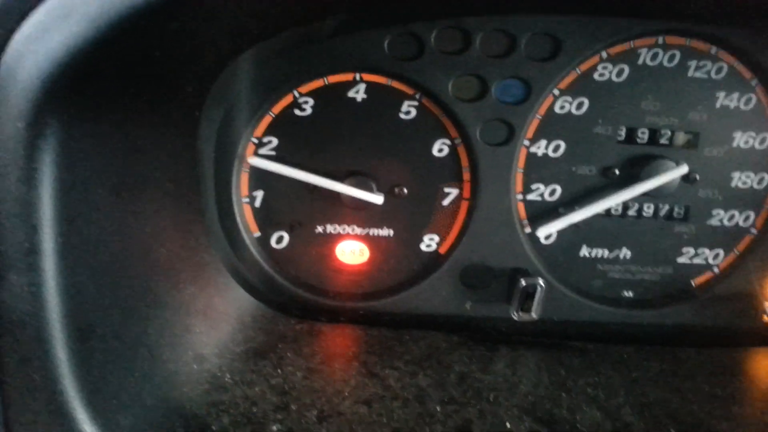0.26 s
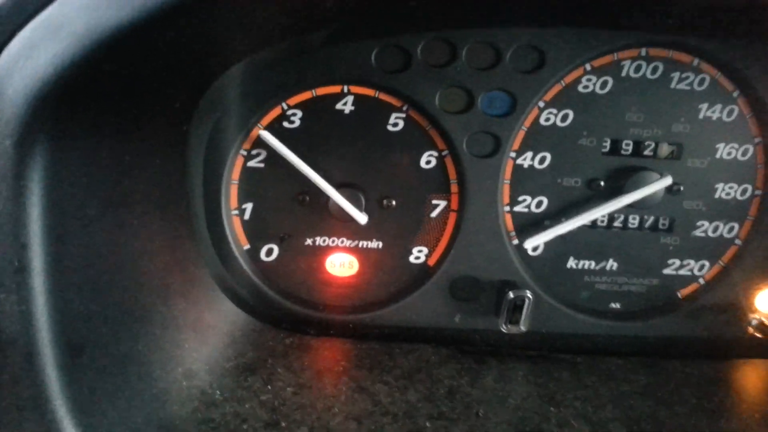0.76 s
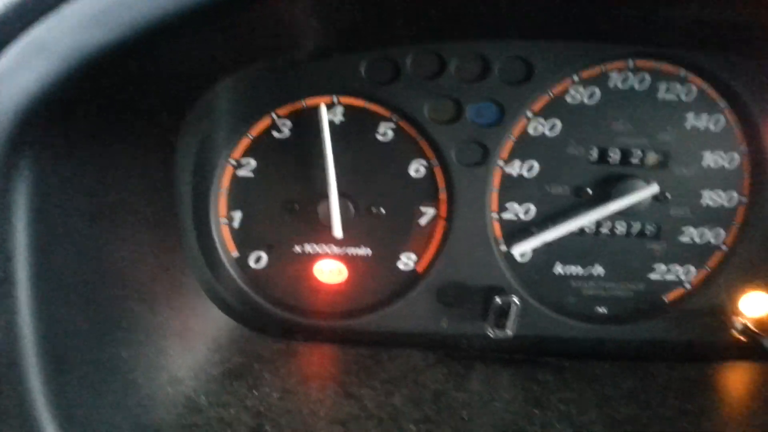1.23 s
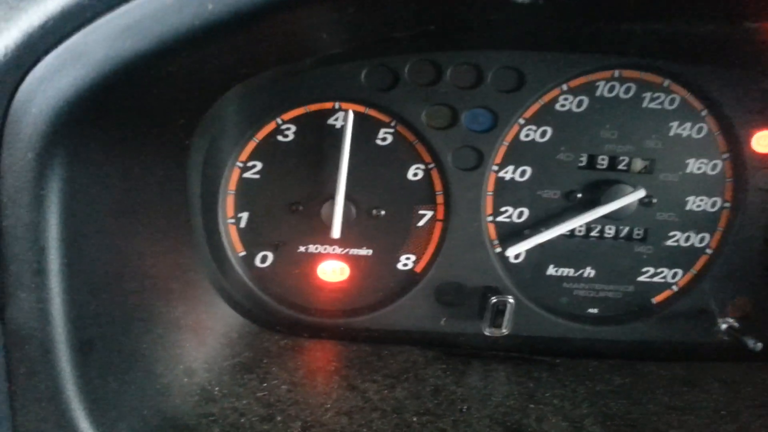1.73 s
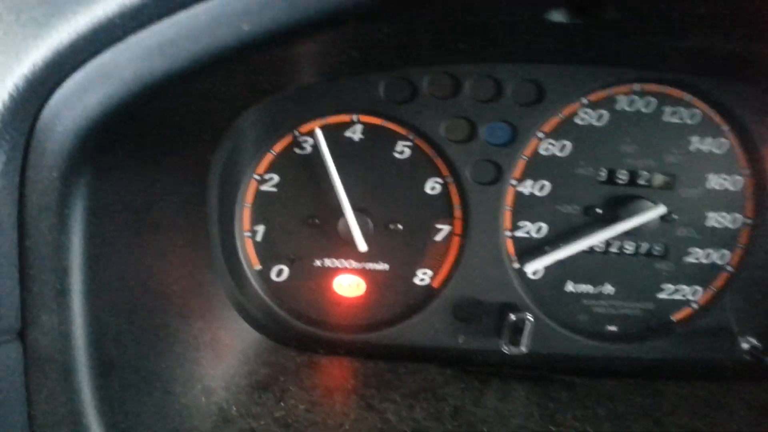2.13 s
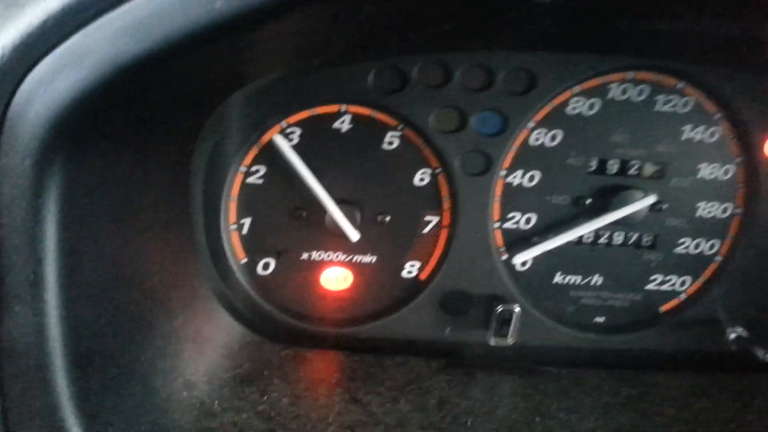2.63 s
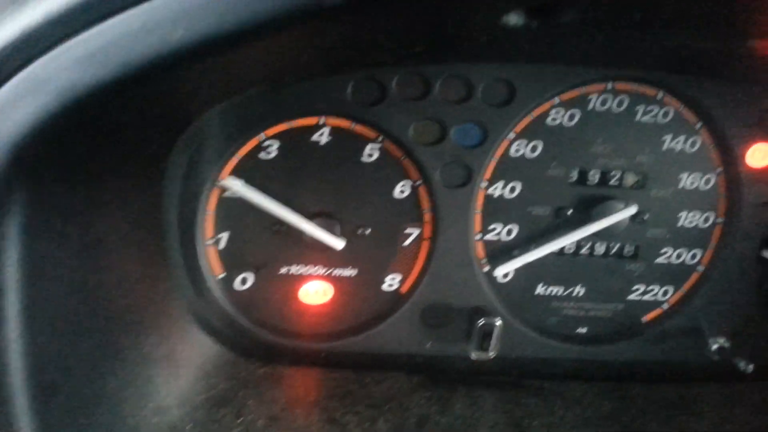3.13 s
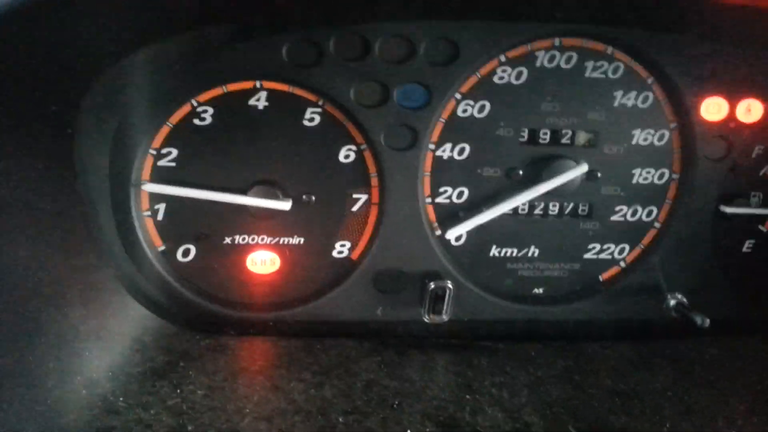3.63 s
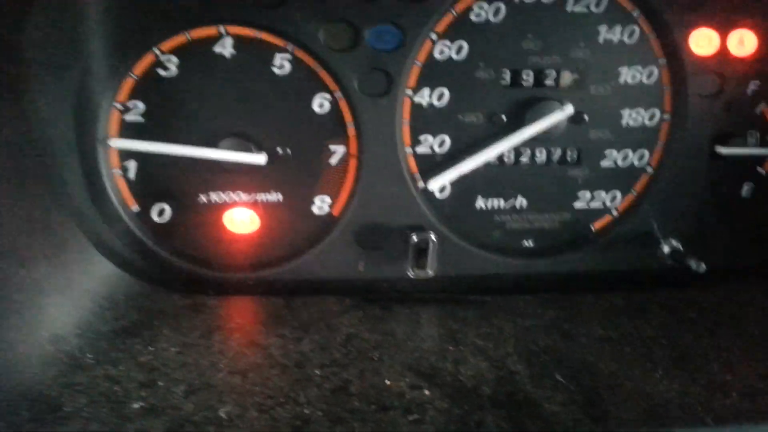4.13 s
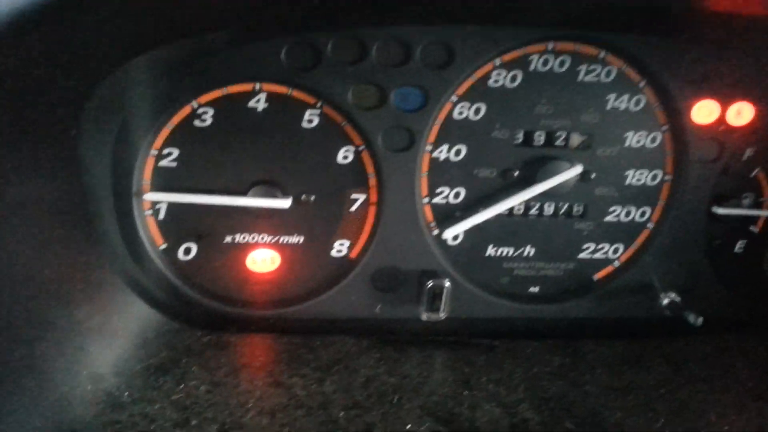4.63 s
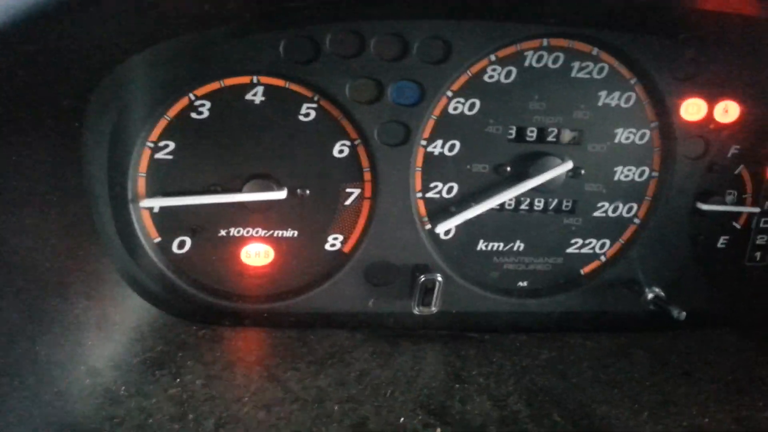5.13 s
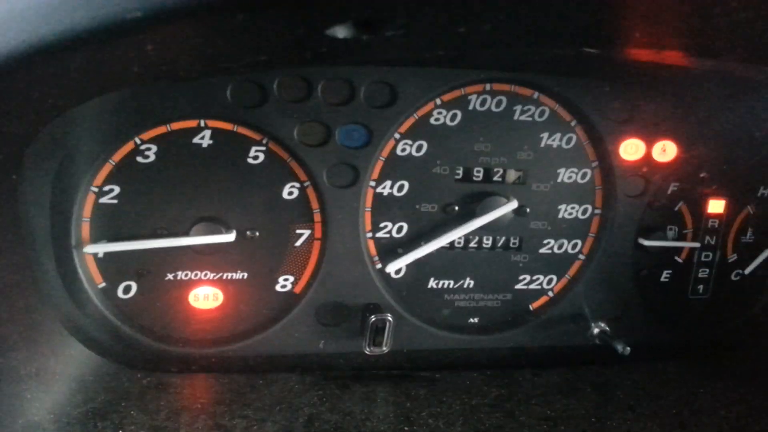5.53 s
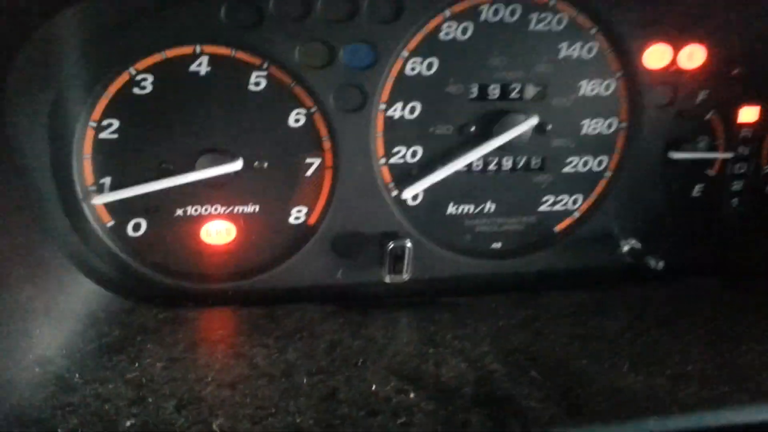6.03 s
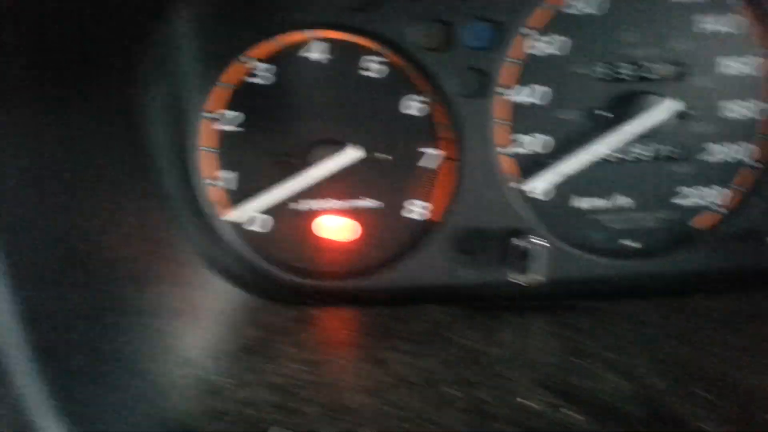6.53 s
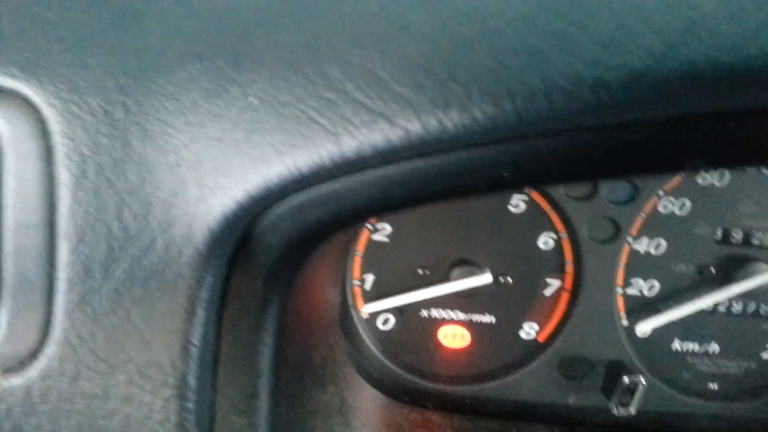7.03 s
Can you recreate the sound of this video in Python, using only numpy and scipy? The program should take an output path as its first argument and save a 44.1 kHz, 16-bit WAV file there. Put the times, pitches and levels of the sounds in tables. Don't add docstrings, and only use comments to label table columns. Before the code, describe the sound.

From the driver's seat, a four-cylinder engine is already revving at 0 s, a low boomy growl broken by missed firings and hard pops. From 0.5 to 1.2 s it climbs more cleanly, with a thin airy whistle near the top. From 1.25 to 1.65 s it peaks as a harsh, pulsing roar with one cylinder out. The throttle shuts and the pitch slides down until 2.15 s in a hollow intake drone; ragged popping barks follow until 2.8 s, then another short coast. From 3.2 s it limps in separate boomy thumps, about twelve a second, with gassy rasps and ringing panels, stumbling in quick clusters near 3.9 s. Beats slow and dull after 4.6 s. By 6.1-6.5 s it nearly stalls, leaving faint pumping, hiss and a tiny belt chirp. Around 7 s it catches with quick low thuds and knocking trim. Loud peaks distort.

```python
import sys
import numpy as np
from scipy import signal
from scipy.fft import rfft, irfft, next_fast_len
from scipy.io import wavfile
from scipy.ndimage import uniform_filter1d, map_coordinates

SR = 44100
rng = np.random.default_rng(int(sys.argv[2]) if len(sys.argv) > 2 else 0)


def magnitude_from_level(level_db):
    exponent = np.asarray(level_db, float) / 20
    return 10 ** exponent


def store_wav(level_fs):
    pcm = np.round(np.clip(np.atleast_2d(level_fs), -1, 1) * 32767)
    wavfile.write(sys.argv[1], SR, pcm.T.astype(np.int16))


N = 320607
TIME = np.arange(N) / SR

# start_s, firing_rate_hz
SPEED = [(0, 58.44), (.09, 63.68), (.2, 61.4), (.36, 69.82), (.48, 69), (.65, 85.77), (.76, 85.56),
         (.86, 99.04), (1.16, 132), (1.28, 133.1), (1.51, 143.6), (1.63, 140.5), (1.72, 130.9),
         (2.21, 93.67), (2.38, 95.64), (2.61, 80.67), (2.77, 84.19), (3.2, 58.26)]
# start_s, end_s, loss_hz (negative: gain)
SPEED_SHIFTS = [
    (.9, .93, -2),
    (.96, 1.04, 2.5),
    (1.49, 1.55, 2),
]
# start_s, load_db, cylinder unevenness (0-1)
THROTTLE = [(0, -30, 0.05), (.11, -27.5, 0.01), (.3, -26.5, 0.48), (.6, -26.5, 0.21), (1.05, -22, 0.1),
            (1.23, -31, 0.2), (1.27, -22, 0.5), (1.63, -23.5, 0.43), (1.7, -28, 0.5), (1.9, -32, 0),
            (2.12, -31.5, 0.1), (2.17, -30.5, 0.3), (2.35, -34, 0.08), (2.47, -28.5, 0.6), (2.5, -32, 0),
            (2.81, -34, 0.4), (3.05, -47, 0.2), (3.15, -78, 0.4)]
# start_s, end_s, depth (0-1)
COASTS = [
    (1.67, 2.143, 1),
    (2.86, 3.2, 0.44),
]
# start_s, end_s, loss_db
MISSES = [(.115, .222, 14), (.25, .273, 14), (.383, .405, 14), (.433, .463, 17), (.492, .503, 6),
          (.672, .715, 12), (.733, .75, 10), (.942, .958, 12), (1.185, 1.2, 6), (2.192, 2.202, 9),
          (2.247, 2.262, 12), (2.275, 2.288, 12), (2.4, 2.418, 9), (2.535, 2.556, 6), (2.592, 2.606, 9),
          (2.64, 2.654, 9), (2.685, 2.7, 9), (2.735, 2.747, 9), (2.782, 2.796, 9)]
# start_s, end_s, depth (0-1)
DEAD_CYLINDER = [
    (1.25, 1.65, 1),
    (1.9, 2.7, 0.07),
    (0.18, 0.29, 0.6),
]
# start_s, end_s, loss_db
CLEAN = [
    (.5, .67, 0.5),
    (.76, .94, 2),
    (.96, 1.2, 0.5),
]
CYLINDERS = [-0.22, -1.77, 0.76, -0.48]
# start_s, second_order_db (lopsided), third_order_db (sharp), upper_orders_db (edge), front_db (steep)
PULSE = [(0, -3.5, 6, 4.5, 5), (.3, -2, 4, -5, 2), (.5, 2, 0.5, 4, 1), (.65, -4.5, 0, 0.5, 5),
         (.8, -4.5, -0.5, -4.5, 4), (.95, -7, -2, 0.8, 0), (1.03, 3, 0.5, 7, 4), (1.18, -0.5, 6.5, -4.5, 0),
         (1.27, -2, 7.5, -0.5, -2), (1.6, -1, -9.5, 6.5, 0.5), (1.72, -4, -1, -3, 2),
         (2, 5.5, 6.5, -8.5, 1), (2.15, -7.5, -2, -5.5, 10.5), (2.3, -4.5, 3, 1.3, 2),
         (2.48, -1.5, 3.5, -1, 3.5), (2.8, -4.5, 4.5, -13.5, -2.5), (2.9, 2.5, -1.5, 6, 12.5),
         (3.15, -6.5, 6.5, -6, -1.5)]
# multiple of firing rate, level_db, db per db of load, db per unit of unevenness,
# db with a cylinder out, plain pumping coast_level_db
FIRING_ORDERS = [(1, 0.5, 0.23, -2.5, -2, -10), (2, -4.5, -0.16, 1.5, 0.5, -20.5),
                 (3, 2, 1.08, -3.5, -28.5, -23.5), (4, -4, 0.24, -11.5, 5.5, -32.5)]
HALF_ORDERS = [(.5, -24, .1, 19, 11, -36.5), (1.5, -21, 0.28, 10, 2.8, -32), (2.5, -33, .3, 18, 6.1, -27)]
# pitch_hz, gain_db
PIPE = [(60, -21), (95, -7), (135, -11.5), (170, -27), (200, -15.5), (245, -6.5), (290, -11.5),
        (420, -24.5)]
# pitch_hz, gain_db
FIREWALL = [(420, 0.5), (520, -1), (600, 1.5), (750, -2), (900, 1), (1100, -1), (1400, -2)]
# start_s, boom_db, bark_db, rasp_db
POPS = [(.006, -13.5, -8, -26.5), (.217, -10, 2, -24.5), (0.266, -6.5, -0.5, -26.5),
        (0.398, -8.5, -6.5, -48), (.457, -9.5, -1.5, -32), (0.71, -9, -10.5, -43),
        (0.746, -10.5, -10.5, -24.5), (1.825, -10, -6, -32.5), (2.173, -18.5, -0.5, -28),
        (2.227, -19, -1, -31.5), (2.283, -15, 0, -42), (2.468, -23.5, -4, -35), (2.513, -13.5, -2.5, -22.5),
        (2.559, -19, -9, -18), (2.604, -5, 0, -22.5), (2.651, -17.5, -3, -20.5), (2.699, -13, 0.5, -33.5),
        (2.743, -4, -3, -22), (2.793, -11.5, 2, -25.5)]
# start_s, boom_db, fire_db, boom_db of the unfired stroke before
FIRINGS = [(3.406, -1.5, -6.5, -12), (3.485, -1.5, 1.5, -11), (3.567, -1.5, 0, -13), (3.648, -1, -1, -6),
           (3.731, -1, -6, -11.5), (3.818, 2, -3, -1.5), (4.053, -1.5, 0, -10), (4.132, -6, -0.2, -12.5),
           (4.208, -2.5, 2.5, -4), (4.285, -4.5, 1, -5), (4.365, -1, -0.7, -11.5), (4.446, 0.5, -17.5, -15),
           (4.534, 1.5, -3.5, -7.5), (4.728, 4, -8, -10), (4.837, 3, -5, -15.5), (4.943, 3, -6, -24),
           (5.048, 4.5, -0.5, -5.5), (5.153, -0.5, -1, -0.5), (5.357, 2, -3.5, -13), (5.462, 0.5, -2.5, -2),
           (5.572, 2, -2, -16.5), (5.693, 2, -6, -13), (5.822, 3.5, -8, -13), (5.955, 3.5, -13, -12.5),
           (6.099, 3, -24, -19), (6.545, 1.8, -16, -23), (6.767, 3, -19, -8), (6.861, 1.5, -23, -17.5),
           (6.947, 2.5, -19.5, -34)]
# start_s, boom_db, fire_db
CATCHES = [(3.189, 0.5, -8.5), (3.217, -19, -13.5), (3.258, 2.5, -8.5), (3.283, -5.5, -13.5),
           (3.318, -7, -25), (3.86, 1, -8), (3.875, -11, -9), (3.89, 0.5, -3), (3.913, -10, -3.5),
           (3.938, -4.5, -3.5), (3.953, -8.5, -9), (3.969, -8, -23), (4.627, -2.5, -21.5),
           (4.657, -10.5, -21), (5.206, 2.5, -5.5), (5.255, 1, -3.5), (6.003, -17, -44), (6.191, -16, -27),
           (6.236, -18, -25), (6.295, -11.5, -52), (6.36, -8.5, -52), (6.419, -9, -44), (6.653, -9, -31),
           (6.722, -3.5, -37), (6.985, 2, -9), (7.214, 1, -13)]
# pitch_hz, level_db, t60_s, arrival_s
BARK = [(247, 2, 0.078, 0.007615), (355.8, -6.5, 0.062, 0.00578), (195.1, 4.5, 0.034, 0.00508),
        (535, -21, 0.053, 0.00572)]
# pitch_hz, level_db (per Hz)
RASP = [(260, -45.5), (450, 2.5), (745, -6.5), (1000, -15.5), (1730, -20), (5930, -50), (9380, -48),
        (13800, -61.5), (15500, -72.5)]
# pitch_hz, width_hz, lift_db
BLOCK = [(1590, 10, 4.5), (2350, 610, -0.5), (3200, 1500, 2.5), (4660, 1500, 3.5), (964, 30, 3.5)]
# pitch_hz, level_db, t60_s
KNOCK = [(507, -11.5, 0.036), (615, -15.5, 0.041), (778, -18.5, 0.044), (1350, -23.5, 0.034)]
# start_s, peak_db, low_pitch_hz, high_pitch_hz
PANELS = [(2.443, -8, 643, 1320), (2.476, -7, 621, 1250), (2.52, -7.5, 617, 1440), (2.565, -6, 647, 1380),
          (2.611, -4, 613, 1250), (2.656, -6, 613, 1230), (2.703, -8, 600, 1344), (2.75, -8, 628, 1450),
          (2.804, -7.5, 519, 1617), (2.836, -14, 571.6, 1284), (3.087, -20.5, 920, 1320),
          (3.191, -24, 523, 1290), (3.273, -19.5, 520, 1256), (3.359, -34, 533, 1620),
          (3.417, -21, 584, 1360), (3.494, -8.5, 563, 1350), (3.574, -11, 560, 1595),
          (3.656, -7.5, 565, 1350), (3.734, -18.5, 564, 1600), (3.824, -13, 627, 1350),
          (3.872, -20.5, 585, 1350), (3.893, -9.5, 784, 1620), (3.93, -12, 527, 1250),
          (4.067, -16, 610, 1450), (4.145, -7.5, 590, 1250), (4.22, -5.5, 605, 1257),
          (4.297, -11, 582, 1573), (4.345, -19, 620, 1320), (4.369, -7, 573, 1343),
          (4.542, -20.5, 526, 1530), (4.736, -19.5, 548, 1395), (4.842, -16, 522, 1230),
          (4.949, -17.5, 524, 1770), (5.053, -11, 526, 1324), (5.162, -13, 535, 1260),
          (5.209, -19.5, 526, 1406), (5.261, -18, 520, 1910), (5.364, -13.5, 505, 1275),
          (5.469, -20, 523, 1700), (5.579, -16, 523, 1370), (5.699, -12, 530, 1354),
          (5.832, -15.5, 537, 1240), (5.961, -23.5, 527, 1284), (6.106, -29, 590, 1790),
          (6.233, -15, 540, 1500),
          (6.652, -21, 374, 902),
    (6.764, -24, 353, 988),
    (6.968, -13, 331, 982),
    (7.0, -12, 470, 956),
    (7.055, -12, 367, 961),
    (7.145, -29, 417, 1100),
    (7.182, -20, 331, 921),
    (7.228, -15, 510, 1100),
]
# start_s, stroke_rate_hz, intake_drone_db, body_shake_db
IDLE = [(3.1, 44.5, -45.5, -22), (3.25, 44.6, -42.5, -18), (3.68, 31, -43, -23.5), (4.07, 41, -40, -21.5),
        (4.74, 28, -46.5, -23), (5.22, 28, -41.5, -21.5), (5.79, 20, -49, -31.5), (6.12, 45, -53, -30),
        (6.34, 14.5, -66, -40), (6.5, 15.6, -57, -33.5), (6.9, 37, -54.5, -30), (7.11, 37, -50, -21.5),
        (7.27, 38, -52, -31)]
# pitch_hz, width_hz, level_db
INTAKE = [(793.5, 17, 3), (950, 110, 5), (563, 150, 4), (1707, 100, -1), (1143, 91, 2)]
# start_s, end_s, depth (0-1)
SINGS = [
    (1.13, 1.24, 0.31),
    (1.67, 2.13, 0.93),
    (2.85, 3.09, 0.75),
]
# start_s, end_s, depth (0-1)
WHISTLES = [
    (1.02, 1.24, 1),
    (1.7, 1.8, .35),
    (1.99, 2.12, .45),
    (2.93, 3.1, 0.2),
]
# pitch_hz, level_db (per Hz)
VALVES = [(200, -34.5), (320, -1.5), (500, -14), (700, -17.5), (1300, -21.5), (2500, -26.5), (4600, -42),
          (6000, -49), (10000, -55), (15000, -70.5)]
# pitch_hz, width_hz, lift_db
CASING = [(790, 31, 2.5), (980, 48, 5), (1370, 27, 3), (2300, 36, 4), (2700, 70, 0), (4060, 45, 4.5)]
# pitch_hz, level_db (per Hz)
RUMBLE = [(25, -58.5), (42, -14), (60, -10), (88, -1), (140, -5.5), (172, -7.5), (240, 0.5), (300, -15.5),
          (500, -32.5), (900, -82.5)]
# pitch_hz, level_db (per Hz)
HISS = [(2000, -0.5), (5000, -7), (9000, -9.5), (14000, -8.5)]
# start_s, level_db
HISS_GAIN = [(0, -66), (3, -60), (5.9, -55), (6.2, -51.5), (7.2, -54.5)]
# start_s, level_db
SQUEAKS = [
    (6.5236, -52),
    (6.8459, -57.5),
    (6.929, -57),
]
# start_s, level_db, pitch_hz, width (share of pitch)
RATTLES = [(6.231, -31, 1590, .05), (6.231, -40, 2100, .05), (6.232, -36, 1500, .8), (6.655, -29, 450, .4),
           (6.971, -24, 520, .4), (6.968, -22, 370, .2), (6.998, -26, 750, .5), (7.054, -21, 430, .45),
           (7.108, -32, 600, .5), (7.224, -24, 650, .5), (7.222, -23, 400, .3), (7.266, -54, 6830, .77)]
# pitch_hz, likeness (0-1)
ALIKE = [(100, 0.97), (300, 0.85), (600, 0.13), (1200, 0.031), (2500, 0.016), (8000, 0.0085)]

FULL_LOAD_DB = -25
BARK_DB, BARK_PER_LOAD, BARK_PER_UNEVEN = -28.5, 0.46, 24
WHINE_DB, WHINE_COAST_DB = -49.5, 21
UPPER_COAST_DB, DRONE_COAST_DB = -2, 17.5
SURGE_DB, SURGE_S, SURGE_PEAK_S = 5, .0625, 1.572
FAST_PIPE_DB = -6.5
THUD_DB, THUD_PER_FIRE = 1.5, .3
PANEL_DB, PANEL_HIGH_DB, PANEL_T60_S, PANEL_HIGH_T60_S = -8, -17, .06, .04
BEFORE_S, AFTER_S, AFTER_DB, SLOW_GAP_S, UNFIRED_DB = 0.0306, 0.0329, -14.5, .088, -43
STEADY_S, STEADY_GAP_S, STEADY_BOOM_DB, STEADY_FIRE_DB = 7.023, .039, -0.4, -22.5
RASP_DB, RASP_PER_FIRE = -20.5, 0.85
GEAR_DB, GEAR_PER_OCTAVE, GEAR_COAST_DB = -40.5, 6.04, -1.5
RUMBLE_SWAY_DB = 1.8
WHISTLE_DB, WHISTLE_HZ, WHISTLE_WIDTH_HZ = -36, 1700, 90
FOLD_AT, FOLD_BACK, FOLD_GAIN = 1.02, .55, 1.036
EASE_S = 0.0064


def blow():
    t = np.arange(SR // 5) / SR
    swell = np.exp(-np.abs((t - .018) / 0.018) ** 3)
    swell = swell + 0.051 * np.exp(-t / 0.026) * (1 - np.exp(-t / 0.0019))
    boom = -np.sin(2 * np.pi * 89 * (t - .004)) * swell * (1 - np.exp(-t / 0.0017))
    thud = -0.5 * np.sin(2 * np.pi * 140 * (t - .006)) * (1 - np.exp(-t / 0.0019)) * np.exp(-t / 0.022)
    bark = []
    for hz, db, t60, arrival in BARK:
        age = np.clip(t - arrival, 0, None)
        bark.append(-magnitude_from_level(db - 60 * age / t60) * np.sin(2 * np.pi * hz * age) * (1 - np.exp(-age / 0.0013)))
    late = np.clip(t - .0035, 0, None)
    spurts = (1 + 0.5 * np.cos(2 * np.pi * 240 * (t - .006))) ** 1.01
    rasp = (1 - np.exp(-late / 0.0019)) * np.exp(-(late / 0.021) ** 3) * spurts
    return (boom, thud), bark, rasp


def revving(bark, gas):
    rate = curves(SPEED)[0] - during(SPEED_SHIFTS)
    rasp_db, uneven = curves(THROTTLE)
    bark_db = BARK_DB + BARK_PER_LOAD * (rasp_db - FULL_LOAD_DB) + BARK_PER_UNEVEN * uneven
    whine_db = WHINE_DB + WHINE_COAST_DB * during(SINGS) + 6 * np.log2(rate / 100)
    loss = 0
    for a, b, db in MISSES:
        loss = loss + db * np.interp(TIME, [a - .002, a + .004, b - .002, b + .002], [0, 1, 1, 0])

    turns = np.cumsum(rate) / SR
    at = np.flatnonzero(np.diff(np.floor(turns)))
    chance = rng.standard_normal((len(at), 2))
    size = np.abs(1 + np.clip(uneven[at], 0, 1) * np.resize(CYLINDERS, len(at))) * magnitude_from_level(.7 * chance[:, 0])
    s = np.abs(at / SR + .00008 * chance[:, 1])
    barks = filtered(struck(s, size - .7, bark), lambda hz: 1 / (1 + (215 / (hz + 1)) ** 6))
    barks = magnitude_from_level(bark_db - 1.6 * loss) * even(barks, 0.021)
    fronts = filtered(struck(s + 0.002867, size, [1.]), lambda hz: magnitude_from_level(along(RASP, hz) - hz / 400))
    fronts = even(fronts, 0.054)

    first, *upper = order_levels(FIRING_ORDERS, rate, rasp_db, uneven)
    halves = order_levels(HALF_ORDERS, rate, rasp_db, uneven)
    for k in range(8):
        upper.append(upper[-2] - 5.5 + 0.5 * (rasp_db + 12.5) + UPPER_COAST_DB * coasting())
    second_db, third_db, edge_db, front_db = curves(PULSE)
    lifts = [second_db, third_db, edge_db] + [edge_db, edge_db + second_db] * 4
    upper = [db + lift for db, lift in zip(upper, lifts)]
    upper = [db + (k > 2) * along(FIREWALL, (k + 2) * rate) for k, db in enumerate(upper)]

    def wave(k):
        return np.sin(k * 2 * np.pi * turns + 0.14 * wobble(14) + np.pi / 2 * (k % 2 == 0))

    surge_db = SURGE_DB * during(DEAD_CYLINDER) * np.cos(2 * np.pi * (TIME - SURGE_PEAK_S) / SURGE_S)
    low = magnitude_from_level(first + surge_db + 2.5 - 0.62 * loss + 0.11 * wobble(24)) * wave(1)
    for k, db in enumerate(halves):
        low = low + magnitude_from_level(db - 0.27 * loss + 0.37 * wobble(11)) * wave(k + .5)
    high = 0
    for k, db in enumerate(upper):
        flutter_db = 2.7 * wobble(14) + 3.0 * during(DEAD_CYLINDER) * wobble(35)
        high = high + magnitude_from_level(db + 2.0 - 0.62 * loss + flutter_db) * wave(k + 2)
    tones = low + high + barks

    spurts = even(np.abs(tones) ** 1.7, .12)
    spurting_rasp = 0.87 * magnitude_from_level(-during(CLEAN)) * spurts * gas + 1.19 * magnitude_from_level(front_db) * fronts
    rasps = magnitude_from_level(rasp_db - 2.1 * loss - 5.9 * coasting()) * spurting_rasp
    whine = filtered(struck(s, size, [1.]), lambda f: intake(f) / (1 + (f / 2000) ** 6))
    whine = magnitude_from_level(whine_db) * even(whine, 0.11)
    running = np.interp(TIME, [3.16, 3.19], [1, 0])
    return running * tones, running * rasps, running * whine


def order_levels(table, rate, load_db, uneven):
    load_db = np.maximum(load_db - FULL_LOAD_DB, -18)
    coast, dead = np.clip(coasting(), 0, 1), during(DEAD_CYLINDER)
    levels = []
    for k, db, per_load, per_uneven, dead_db, coast_db in table:
        powered = along(PIPE, k * rate) + db + per_load * load_db + per_uneven * uneven + dead_db * dead
        levels.append((1 - coast) * powered + coast * coast_db)
    return levels


def idling(boom, bark, rasp, gas):
    strokes = idle_strokes()
    strokes = np.c_[strokes, RASP_DB + RASP_PER_FIRE * strokes[:, 2]]
    s, boom_db, bark_db, rasp_db = np.vstack([POPS, strokes]).T
    fast = (s > 2) & (s < 3)
    tones = struck(s, magnitude_from_level(boom_db - 9.0), boom[0])
    tones = tones + struck(s, magnitude_from_level(bark_db - 1.5), sum(bark) - bark[2])
    tones = tones + struck(s, magnitude_from_level(bark_db - 2.5 + FAST_PIPE_DB * fast), bark[2])
    thud_db = boom_db - 7.5 + THUD_DB + THUD_PER_FIRE * np.maximum(bark_db, -25)
    tones = tones + struck(s, magnitude_from_level(thud_db), boom[1]) + panels() + knocks(s, bark_db)
    clatter = rush(lambda hz: np.exp(-(np.log((hz + 1) / 2600) / 0.5) ** 2))
    clatter = struck(s, magnitude_from_level(2.7 * boom_db - 50), rasp) * clatter
    rasps = struck(s, magnitude_from_level(1.185 * rasp_db - 0.5), rasp) * ringing(gas, depth_db=2.5)
    return tones, rasps + clatter


def idle_strokes():
    s, boom_db, fire_db, before_db = np.transpose(FIRINGS)
    fired, fired_db = np.array(sorted([r[:2] for r in FIRINGS + CATCHES])).T
    alone = np.diff(fired, append=fired[-1]) > SLOW_GAP_S
    slow = fired[alone]
    steady = STEADY_S + STEADY_GAP_S * np.array([0, 1, 2, 3, 4, 5.85])

    def row(t, boom, fire):
        return np.transpose(np.broadcast_arrays(t, boom, fire))

    def scatter(t):
        return 3 * rng.standard_normal(len(t))

    before = row(s - BEFORE_S, before_db, UNFIRED_DB + scatter(s))
    after = row(slow + AFTER_S, AFTER_DB + 0.38 * fired_db[alone], UNFIRED_DB + scatter(slow))
    caught = row(steady, STEADY_BOOM_DB, STEADY_FIRE_DB + scatter(steady))
    return np.vstack([row(s, boom_db, fire_db), CATCHES, before, after, caught])


def knocks(s, bark_db):
    t = np.arange(SR // 8) / SR
    luck = rng.standard_normal((len(s), 2 * len(KNOCK)))
    out = 0
    for k, (hz, db, t60) in enumerate(KNOCK):
        mode = magnitude_from_level(-60 * t / t60) * (1 - np.exp(-t / 0.0038)) * np.sin(2 * np.pi * hz * t)
        start = s + 0.00688 + .002 * np.abs(luck[:, -1 - k])
        out = out + struck(start, magnitude_from_level(1.2 * bark_db + db - 1 + 1.8 * luck[:, k]), mode)
    return out


def panels():
    out, t = np.zeros(N + SR), np.arange(SR // 10) / SR

    def ring(hz, db, t60):
        return magnitude_from_level(db - 60 * t / t60) * (1 - np.exp(-t / 0.003)) * np.sin(2 * np.pi * hz * t)

    for s, db, low_hz, high_hz in PANELS:
        both = ring(low_hz, db + PANEL_DB, PANEL_T60_S) + ring(high_hz, db + PANEL_HIGH_DB, PANEL_HIGH_T60_S)
        out[round(s * SR):][:len(t)] += both
    return out[:N]


def ringing(x, depth_db):
    z = signal.stft(x, nperseg=1024)[2]
    field = uniform_filter1d(rng.standard_normal(z.shape[1:]), 4, 0)
    field = uniform_filter1d(field, 5, 1)
    bands = magnitude_from_level(depth_db * 1.2 * np.tanh(unit(field) / 0.98))
    return unit(signal.istft(z * bands, nperseg=1024)[1][:, :N]) * np.std(x)


def intake(f):
    total = 0
    for k, (c, w, db) in enumerate(INTAKE):
        total = total + (-1) ** k * magnitude_from_level(db) * 1j * f * w / (c * c - f * f + 1j * f * w)
    return total ** 2


def block(spectrum, lifts=BLOCK):
    return lambda f: magnitude_from_level(along(spectrum, f) + sum(db / (1 + (2 * (f - c) / w) ** 2) for c, w, db in lifts))


def small_noises():
    t = np.arange(SR // 6) / SR
    chirp_swell = (t / .011) * np.exp(1 - t / .011) + .15 * np.exp(-t / .06)
    chirp = np.sin(2 * np.pi * 9930 * t) * chirp_swell
    chirp_s, chirp_db = np.transpose(SQUEAKS)
    out = magnitude_from_level(2.8 * wobble(120)) * struck(chirp_s - .008, magnitude_from_level(chirp_db), chirp)
    for s, db, hz, width in RATTLES:
        edges = np.array([1 / (1 + abs(width)), 1 + abs(width)]) * hz
        band = signal.butter(3, edges, "band", fs=SR, output="sos")
        burst = unit(signal.sosfilt(band, rng.standard_normal(len(t)))) * np.exp(-t / 0.0096)
        start = round(s * SR)
        out[start:][:len(t)] += magnitude_from_level(db) * burst[:N - start]
    return out


def machinery():
    idle_rate, drone_db, shake_db = curves(IDLE)
    rate = np.where(TIME < IDLE[0][0], curves(SPEED)[0], idle_rate)
    drone_db = drone_db - 4.0 + DRONE_COAST_DB * during(SINGS) + 2 * coasting()
    drone = magnitude_from_level(drone_db + 1.8 * wobble(30)) * rush(intake)
    gear_db = GEAR_DB + GEAR_PER_OCTAVE * np.log2(rate / 100) + GEAR_COAST_DB * coasting()
    gear = magnitude_from_level(gear_db + 10.0 + 2.8 * wobble(44)) * rush(block(VALVES, BLOCK + CASING))
    rumble = magnitude_from_level(shake_db + RUMBLE_SWAY_DB * wobble(11)) * rush(lambda hz: magnitude_from_level(along(RUMBLE, hz)))
    edge_air = rush(lambda hz: 1 / (1 + ((hz - WHISTLE_HZ) / WHISTLE_WIDTH_HZ) ** 2))
    whistle = magnitude_from_level(WHISTLE_DB + 2.2 * wobble(43)) * during(WHISTLES) * edge_air
    hiss = magnitude_from_level(curves(HISS_GAIN)[0] + 1.7 * wobble(3.6))
    hiss = hiss * magnitude_from_level([[1], [-1]]) * rush(lambda hz: magnitude_from_level(along(HISS, hz)))
    return drone + gear + rumble + whistle + hiss


def unit(x):
    return x / np.sqrt(np.mean(x ** 2) + 1e-20)


def even(x, span_s):
    return x / np.sqrt(np.abs(uniform_filter1d(x ** 2, int(span_s * SR))) + 1e-6)


def along(points, hz):
    f, v = np.transpose(points)
    return np.interp(np.log(hz + 1), np.log(f + 1), v)


def curves(rows):
    s, *cols = np.transpose(rows)
    return [np.interp(TIME, s, c) for c in cols]


def during(spans):
    total = 0
    for a, b, depth in spans:
        corners = [a - EASE_S, a + EASE_S, b - EASE_S, b + EASE_S]
        total = total + np.interp(TIME, corners, [0, depth, depth, 0])
    return total


def coasting():
    return during(COASTS)


def wobble(rate):
    return map_coordinates(rng.standard_normal(int(N * rate / SR) + 4), [TIME * rate])


def filtered(x, response):
    m = next_fast_len(N + SR // 2)
    return irfft(rfft(x, m) * response(np.fft.rfftfreq(m, 1 / SR)), m)[..., :N]


def struck(s, size, shape):
    train = np.bincount(np.round(np.asarray(s) * SR).astype(int), size, N + SR)[:N]
    return signal.fftconvolve(train, shape)[:N]


def rush(gain):
    def mid_side(hz):
        turn = np.arccos(np.clip(along(ALIKE, hz), -1, 1)) / 2
        return gain(hz) * [np.cos(turn), np.sin(turn)]

    mid, side = filtered(rng.standard_normal((2, N)), mid_side)
    return unit(np.array([mid + side, mid - side]))


def scene():
    boom, bark, rasp = blow()
    gas = rush(block(RASP)) * 2.59
    rev_tones, rev_rasp, whine = revving(sum(bark), gas)
    idle_tones, idle_rasp = idling(boom, bark, rasp, gas)
    tones = rev_tones + idle_tones
    sway = .27 * wobble(9) * filtered(tones, lambda hz: 1 / (1 + (180 / (hz + 1)) ** 6))
    tones = tones * magnitude_from_level([[.4], [-.4]]) + np.array([sway, -sway])

    def lag(s):
        return lambda hz: np.exp(1j * np.outer([-1, 1], 2 * np.pi * hz * s))

    exhaust = filtered(tones + (rev_rasp + idle_rasp) * magnitude_from_level([[.6], [-.6]]), lag(.00009))
    fade_in = np.minimum(1, TIME / 0.0009)
    return exhaust * fade_in + filtered(whine, lag(-0.00012)) + machinery() + small_noises()


def roll_off(x):
    return signal.sosfilt(signal.butter(12, 15000, fs=SR, output="sos"), x)


def record(dry):
    cut = filtered(dry, lambda f: ((1j * f) ** 2 / (48 ** 2 - f * f + 1j * f * 48 * 0.92)) ** 2)
    over = np.maximum(np.abs(cut) - FOLD_AT, 0)
    folded = cut - (1 + FOLD_BACK) * np.sign(cut) * over
    held = FOLD_GAIN * filtered(folded, lambda f: 1 / (1 + (40 / (f + 1)) ** 8))
    held = filtered(np.clip(held, -1, 1), lambda f: 1 / (1 + (f / 14800) ** 40))
    return roll_off(held)


dry = scene()
out = record(dry)
store_wav(out)
```